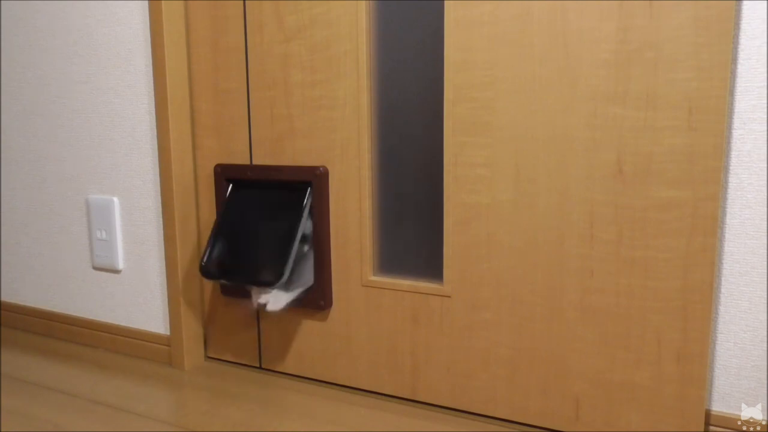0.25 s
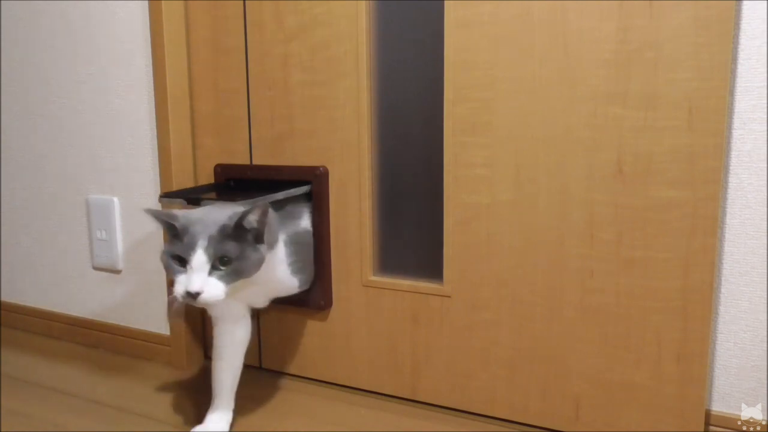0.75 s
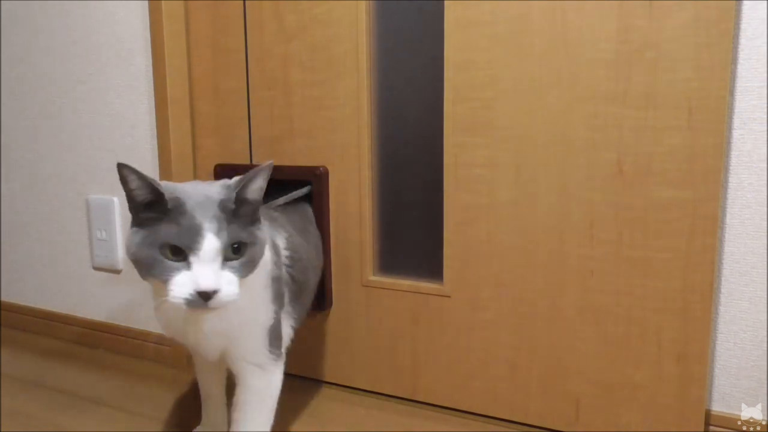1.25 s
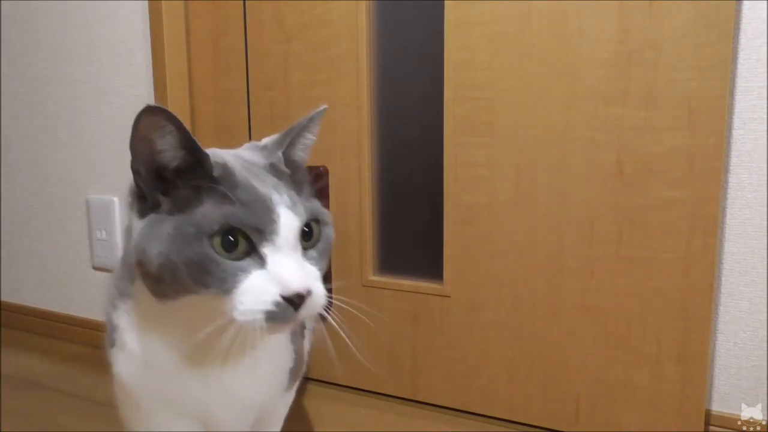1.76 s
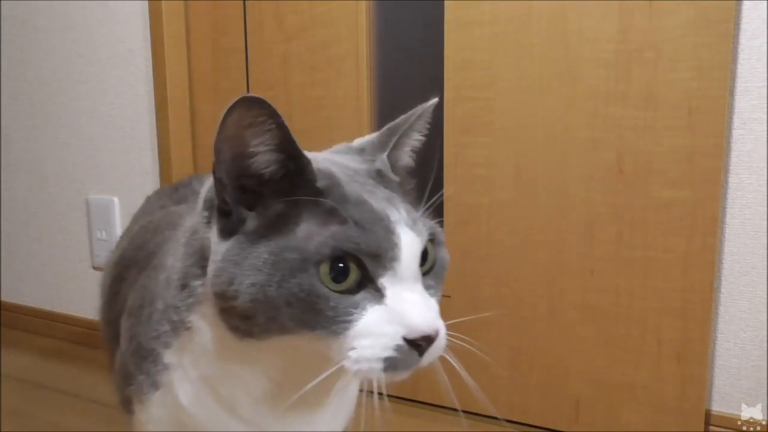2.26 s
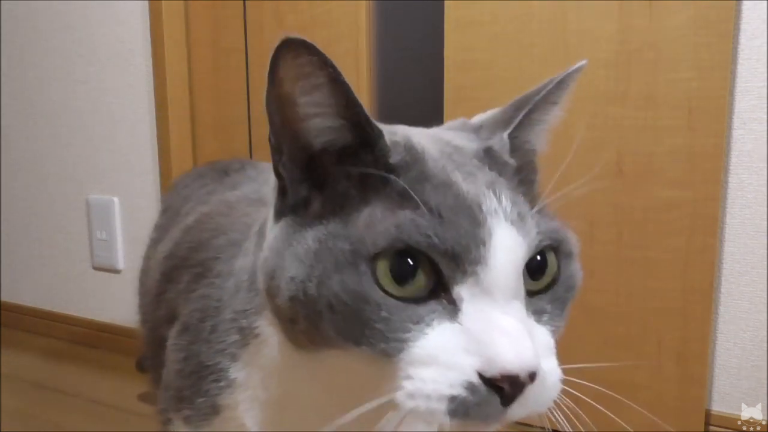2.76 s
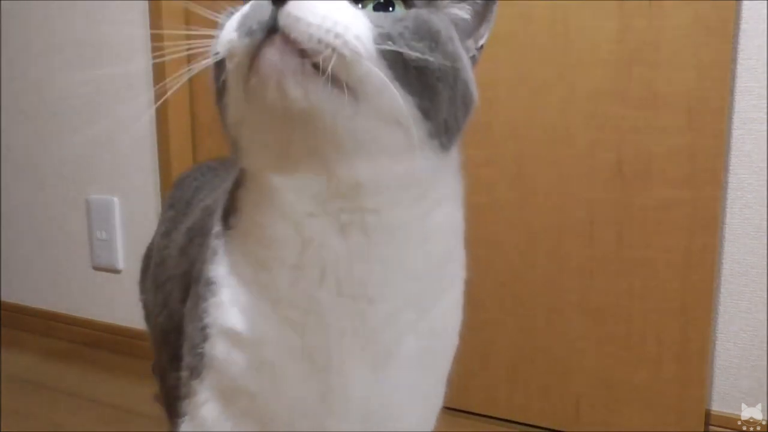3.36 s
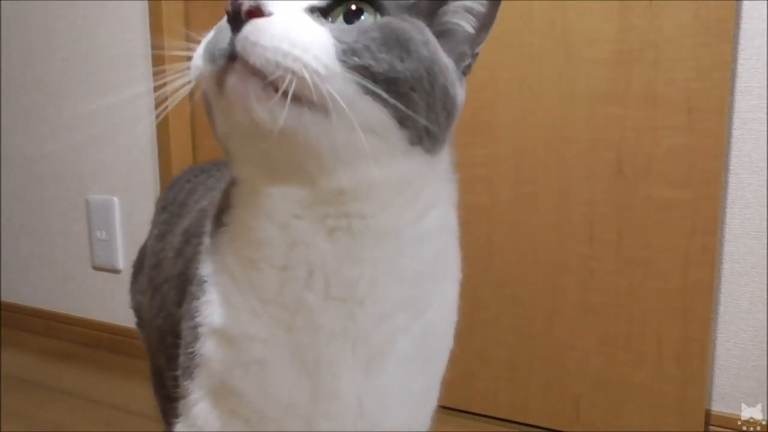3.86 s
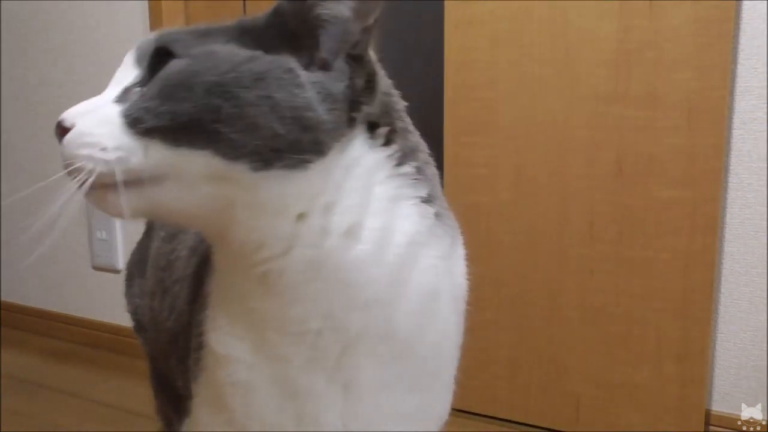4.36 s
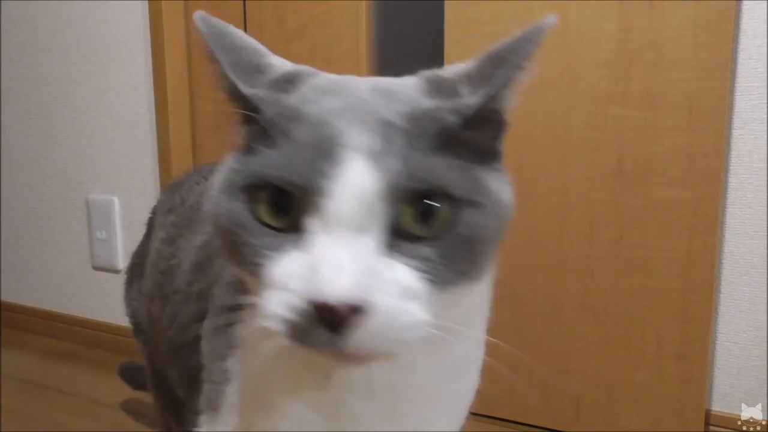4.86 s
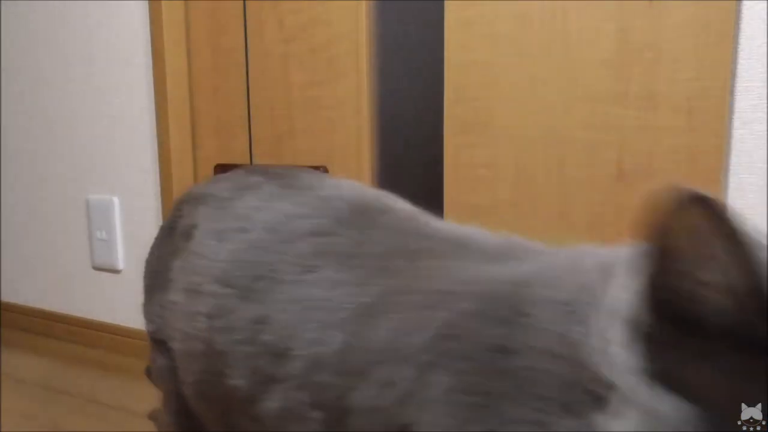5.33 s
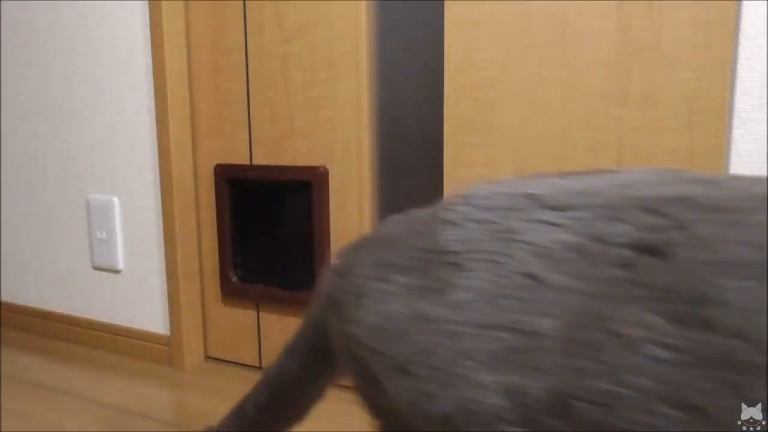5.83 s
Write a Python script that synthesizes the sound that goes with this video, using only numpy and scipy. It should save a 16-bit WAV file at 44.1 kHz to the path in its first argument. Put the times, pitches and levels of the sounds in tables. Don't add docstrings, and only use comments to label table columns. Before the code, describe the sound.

In a small hard room, a cat pushes through a plastic flap in a wooden door: light taps, a sharp cluster of knocks, faint fur brushing, softer bumps, then the flap drops with the loudest double clack and rattles to rest. Low house hum and hiss follow, with tiny clicks. At the end the cat, to the right, trills into a meow. Close stereo microphones.

```python
import sys
import numpy as np
from scipy import signal
from scipy.fft import rfft, irfft, next_fast_len
from scipy.io import wavfile

SR = 44100
rng = np.random.default_rng(int(sys.argv[2]) if len(sys.argv) > 2 else 0)


def int16_out(signal):
    q = np.round(np.clip(np.atleast_2d(signal).T, -1, 1) * 32767)
    wavfile.write(sys.argv[1], SR, q.astype(np.int16))


def convert_level_to_amplitude(level_db):
    exponent = np.asarray(level_db, float) / 20
    return 10 ** exponent


N = 268569
TIME = np.arange(N) / SR
PAD = 2 * next_fast_len(N // 2 + 2048)
FREQ = np.maximum(np.fft.rfftfreq(PAD, 1 / SR), 1)


def read(table, hz):
    return np.interp(np.log(hz), np.log(np.array(table)[:, 0]), np.array(table)[:, 1])


def noise(gain):
    spectrum = rng.standard_normal(len(FREQ)) + 1j * rng.standard_normal(len(FREQ))
    x = irfft(gain * spectrum, PAD)[:N]
    return x / x.std()


def peak(hz, width_hz):
    return 1 / np.sqrt(1 + ((FREQ - hz ** 2 / FREQ) / width_hz) ** 2)


def walk(rate_hz):
    return noise(1 / (1 + (FREQ / rate_hz) ** 2))


def swell(rows, skew, gain=convert_level_to_amplitude):
    total = 0
    for start_s, length_s, db in rows:
        progress = np.clip((TIME - start_s) / length_s, 0, 1)
        total = total + gain(db) * np.sin(np.pi * progress ** skew)
    return total


def ring(hz, t60_s, rise_s, length_s=.25):
    t = np.arange(int(length_s * SR)) / SR
    decay = np.exp(-np.log(1000) * t / t60_s)
    return np.sin(2 * np.pi * hz * t) * (1 - np.exp(-t / rise_s)) * decay


def add(out, s, x):
    i = int(s * SR)
    out[..., i:i + x.shape[-1]] += x[..., :N - i]


def stereo(mid, other, side_table):
    side = irfft(rfft(other, PAD) * convert_level_to_amplitude(read(side_table, FREQ)), PAD)[:len(mid)]
    return np.array([mid + side, mid - side])


def panel(blows, modes, scatter_db, rise_s, slap_db, room_db):
    # f/Hz, level/dB per Hz
    slap_modes = [(150, -33), (300, 4), (700, 8), (1200, 1), (1700, -21.5), (2300, -22), (3000, -31)]
    wood_t60_s = .1
    out = np.zeros((2, N))
    chance = rng.standard_normal((len(blows), 2, len(modes)))
    frame = noise(convert_level_to_amplitude(read(slap_modes, FREQ)))
    t = TIME[:SR // 4]
    for (s, db, tilt_db, hold), (mix, shift) in zip(blows, chance):
        hold = np.clip(hold, .1, 1.5)
        modal = np.zeros(int(.25 * SR))
        for (hz, mode_db, t60_s), m, d in zip(modes, mix, shift):
            level = convert_level_to_amplitude(mode_db + tilt_db * np.log2(hz / 300) + scatter_db * m) * np.sign(d)
            t60_s = min(t60_s, wood_t60_s * (300 / hz) ** 0.22) * hold
            modal += level * ring(hz * (1 + 0.019 * d), t60_s, rise_s * (1 + 1.6 * (hz > 600)))
        slap = frame[int(s * SR):int(s * SR) + len(t)]
        slap = slap * (1 - np.exp(-t / (1.07 * rise_s))) ** 2 * np.exp(-t / (0.015 * hold))
        blow = convert_level_to_amplitude(db) * (modal / np.abs(modal).max() + convert_level_to_amplitude(slap_db + 1.53 * tilt_db) * slap)
        add(out, s, blow * convert_level_to_amplitude(np.array([[0], [room_db]])))
    return out


def door_panel():
    # t/s, peak level/dB, hardness as tilt/(dB per octave), ring length factor
    blows = [(0.166, -33.5, 0.5, 0.64), (0.187, -45, -1.5, 0.7), (0.254, -32.5, -10, 1),
             (0.274, -36.5, 4.5, 0.88), (0.294, -30, -0.5, 0.89), (0.33, -27, 2.5, 0.33),
             (0.344, -36.5, 0, 0.28), (0.799, -30.5, -8, 0.23), (1.118, -37, -1.5, 0.86),
             (1.145, -48, 5, 0.51), (1.538, -41.5, -2.5, .9), (1.664, -32, -17, 0.65),
             (1.684, -29, 1.5, 0.67), (1.719, -30, -4.5, 0.62), (2.33, -29, -4, 0.33),
             (2.384, -16.5, -1, 0.74), (2.402, -18.5, 4, 1), (2.429, -28.5, 5.5, 0.68),
             (2.75, -26, 5, 0.14), (2.774, -28, -3, 0.5), (2.794, -32.5, 6.5, 0.55),
             (2.839, -36, -1.5, 0.79)]
    # f/Hz, level/dB, T60/s
    door_modes = [(231.4, -2.5, 0.2), (273, 2, 0.7), (355, -3.5, 0.28), (527, -2, 5.0), (574, -14, 0.24),
                  (675, -14.5, 0.23), (820, -33, 1.5), (893, -26, 5.0), (990, -45, 0.3), (1116, -20, 0.19),
                  (1440, -28, 0.05), (1530, -38, 0.05), (1720, -39, 0.38), (2110, -29, 0.18)] + [(171, -12, 0.19), (435.5, -10.0, .2)]
    return panel(blows, door_modes, scatter_db=3.9, rise_s=0.0031, slap_db=-11, room_db=-3)


def flap_panel():
    # t/s, peak level/dB, hardness as tilt/(dB per octave), ring length factor
    shoves = [
        (0.475, -21, -6.5, 0.47),
        (0.484, -20, 0.7, 0.8),
        (0.5, -16.5, 0.1, 0.45),
        (0.529, -26, -3, 0.53),
    ]
    # f/Hz, level/dB, T60/s
    flap_modes = [(144.6, -14, 1.1), (257, 2.5, 0.53), (348, 3, 0.089), (477, -1, 0.42), (552, 1.5, 0.41),
                  (642, 3, 0.11), (730, -1, 0.4), (816, -38, 0.29), (986, -2.5, 0.2), (1260, -28, 0.43),
                  (1280, -19, 0.23), (1364, -2.5, 0.24), (1500, -14, 0.21), (2000, -39, 0.26)]
    return panel(shoves, flap_modes, scatter_db=0.66, rise_s=0.0044, slap_db=-7.0, room_db=-5)


def thumps():
    # t/s, peak level/dB, f/Hz
    weights = [(0.1609, -22, 213), (0.293, -36, 270), (0.473, -20, 326), (0.508, -36, 623),
               (0.535, -31, 560), (0.799, -29.5, 104), (1.121, -40, 283), (1.677, -32.5, 111),
               (1.679, -23, 225), (1.689, -22.5, 218), (1.708, -25, 226), (1.731, -37, 260),
               (1.762, -29.5, 260), (2.38, -13.5, 268), (2.405, -13, 245), (2.432, -28, 570),
               (2.753, -38, 330), (2.772, -23, 268), (2.845, -29, 244)]
    out = np.zeros(N)
    for s, db, hz in weights:
        add(out, s, convert_level_to_amplitude(db) * ring(hz, 12.3 / hz, 0.0012))
    return out


def ticks():
    # t/s, peak level/dB, ring f/Hz, crack level/dB
    edge_ticks = [(0.168, -41.5, 1280, -58.5), (0.257, -44.5, 1350, -59.5), (0.2852, -42.5, 1320, -61),
                  (0.3321, -42, 1350, -63), (1.6796, -42, 1383, -56), (2.7352, -32.5, 1527, -56.5),
                  (2.7707, -31.5, 1260, -51), (2.7844, -37, 1280, -58), (2.831, -36, 1420, -66),
                  (2.8384, -38, 1550, -65), (2.8807, -34.5, 1450, -56.5), (2.9297, -43.5, 1390, -70)]
    slams = [
        (0.4837, -28, 1467, -46.5),
        (0.4944, -26, 1483, -47),
        (2.3858, -31.5, 1530, -40.5),
        (2.3984, -49, 1530, -54),
        (2.4139, -37, 1660, -52),
        (2.4268, -31, 1410, -49.5),
    ]
    # t/s, ring level/dB, crack level/dB
    claws_lips = [(0.7951, -51, -53.5), (1.6268, -64, -57), (2.2846, -53, -58), (2.295, -65, -61),
                  (4.5166, -55, -63), (5.1212, -69, -60.5), (5.3426, -58, -75), (5.402, -71, -61),
                  (5.521, -73, -59.5), (5.5531, -66, -51.5)]
    # t/s, peak level/dB
    latch = [
        (0.185, -45),
        (0.214, -54),
    ]
    # f/Hz, level/dB per Hz
    crack_bands = [(2200, -27), (3000, -36), (3600, 5), (4700, 4), (6100, -9), (8000, -3.5), (11000, -16),
                   (14000, -43), (15500, -51)]
    clicks = [(s, db, 1420, crack_db) for s, db, crack_db in claws_lips]
    out = np.zeros((2, N))
    crack = noise(convert_level_to_amplitude(read(crack_bands, FREQ)) * (FREQ > 2000))
    t = TIME[:int(.05 * SR)]
    for rows, pan_db, thin in ((edge_ticks, 3, 0.45), (slams, 7, 0.96), (clicks, 1.5, 0.66)):
        for s, db, hz, crack_db in rows:
            edge = ring(hz, 0.019, 0.00016, .05)
            edge += 0.44 * ring(1.31 * hz, 0.02, 0.0011, .05)
            edge += 0.45 * ring(0.81 * hz, 0.061, 0.0027, .05)
            snap = crack[int(s * SR):int(s * SR) + len(t)] * np.exp(-t / (73 / SR))
            snap = (1 - thin) * snap + thin * np.diff(snap, n=2, prepend=[0, 0])
            tick = convert_level_to_amplitude(db - 0.5) * edge + convert_level_to_amplitude(crack_db + 11.5) * snap
            add(out, s, tick * convert_level_to_amplitude(np.array([[pan_db], [-pan_db]]) / 2))
    for s, db in latch:
        add(out, s, convert_level_to_amplitude(db) * ring(1074, 0.09, .003))
    return out


def brushes():
    # start t/s, length/s, level/dB
    strokes = [(0.23, 0.17, -63.5), (0.478, 0.059, -42.5), (0.83, 0.094, -66), (1.35, 0.33, -73.5),
               (1.616, 0.17, -59.5), (1.781, 0.12, -63.5), (2.381, 0.12, -45), (2.732, 0.29, -56),
               (0.894, 1, -71)]
    # f/Hz, level/dB per Hz
    brush_bands = [(350, -36), (600, -0.5), (1070, 8.5), (1600, -8.5), (4710, -5.5), (6780, -15),
                   (10400, -13), (15000, -37)]
    # f/Hz, side minus mid level/dB
    fur_side = [(600, -2), (3000, -3.5), (12000, -5)]
    grain = noise(convert_level_to_amplitude(read(brush_bands, FREQ)) * (FREQ > 600))
    return swell(strokes, 0.36) * convert_level_to_amplitude(1.65 * walk(150)) * stereo(grain, grain[::-1], fur_side)


def mouth(hz, mouth_hz):
    r = hz / mouth_hz
    sharpness, steepness = 3.3, 1.5
    jaws = ((1 - r ** 2) ** 2 + (r / sharpness) ** 2) ** (-steepness / 2)
    q = r / 2.05
    nasal = np.sqrt(((1 - q ** 2) ** 2 + (.6 * q) ** 2) / (1 + q ** 4))
    throat_hz, throat_width_hz = 1820, 450
    throat = 1 + convert_level_to_amplitude(8) / (1 + (2 * (hz - throat_hz) / throat_width_hz) ** 2)
    folds = convert_level_to_amplitude(-2 * np.log2(hz / 350))
    opening = np.clip((mouth_hz - 930) / 250, 0, 1) ** 2
    wide = convert_level_to_amplitude(-17) * opening * (hz > 1900) * (2000 / hz) ** 1.2
    return folds * jaws * nasal * throat + wide


def cat():
    # t/s, pitch f/Hz, effort level/dB, mouth resonance f/Hz
    meow = [
        (5.62, 350, -59, 330),
        (5.651, 320, -44.5, 510),
        (5.68, 312.2, -41, 544),
        (5.735, 322.1, -43, 533),
        (5.774, 356.3, -40.5, 652),
        (5.888, 365.1, -39.5, 787),
        (5.959, 380.3, -43, 926),
        (6.02, 377.5, -45, 1060),
        (6.09, 371.8, -37.5, 1320),
    ]
    # crest t/s, depth (0-1), push level/dB
    trill = [(5.631, 0.66, -2), (5.651, 0.32, 0), (5.679, .95, 1), (5.702, 0.86, 2), (5.726, 0.9, 2),
             (5.755, 0.43, 1.5), (5.782, 1, -0.5), (5.807, 0.26, -2), (5.828, 0.94, -3.5), (5.858, 0, -1.5),
             (5.886, 0.39, -0.5), (5.912, 0.97, 3), (5.936, 1, 0.5), (5.967, 0.97, 2.5), (5.998, 1, 7.5),
             (6.013, 0.33, 4), (6.037, 0.37, 3.5), (6.071, 0.32, -0.5), (6.1, 0, -8)]
    # f/Hz, width/Hz, level/dB
    breath = [(2800, 370, -1), (4380, 1200, 1.5), (7900, 2900, -2.5)]
    # start t/s, length/s, level/dB
    puffs = [
        (5.65, 0.051, -64.5),
        (5.72, 0.12, -70),
        (5.82, 0.26, -59.5),
        (6.02, 0.16, -68),
    ]
    s, *columns = np.transpose(meow)
    hz, effort_db, mouth_hz = (np.interp(TIME, s, c) for c in columns)
    crest, *columns = np.transpose(trill)
    depth, push_db = (np.interp(TIME, crest, c) for c in columns)
    throbs = np.interp(TIME, crest, np.arange(len(crest)))
    flutter = (1 - np.cos(2 * np.pi * throbs)) / 2
    shut = depth * flutter
    sag = 0.15 * np.clip(1 - mouth_hz / 1342, 0, 1) * np.clip(depth + .3, 0, 1)
    phase = 2 * np.pi * np.cumsum(hz * (1 - sag * flutter)) / SR
    phase = phase + 2.2 * sag * walk(90)
    voice = (1 - 0.65 * shut) * mouth(hz, mouth_hz) * np.sin(phase)
    upper = 0
    for k in range(2, 13):
        upper = upper + convert_level_to_amplitude(1.5) * mouth(k * hz, mouth_hz) * np.sin(k * phase + 0.275 * k ** 2)
    ninth = convert_level_to_amplitude(-42.5) * np.clip((TIME - 6.055) / 0.015, 0, 1) * np.sin(9 * phase)
    nose = convert_level_to_amplitude(-61.0) * np.exp(-((TIME - 5.95) / 0.062) ** 2) * noise(peak(3867, 130) ** 2)
    rasp = convert_level_to_amplitude(-9) * np.clip(depth + 0.45, 0, 1) * noise(peak(950, 800) ** 2)
    air = swell(puffs, 0.81) * noise(sum(convert_level_to_amplitude(db) * peak(f, w) ** 2 for f, w, db in breath))
    start = np.clip((TIME - s[0]) / 0.012, 0, 1)
    throat = convert_level_to_amplitude(effort_db + push_db) * (voice + (1 - shut) * upper + (1 - .5 * shut) * rasp)
    return start * (throat + ninth + (1 - 0.62 * shut) * air + nose)


def from_right(x):
    left_lag_s = 0.00017
    shadow = convert_level_to_amplitude(-5.0 * np.clip(np.log2(FREQ / 350), 0, 1))
    delay = np.exp(-2j * np.pi * np.minimum(FREQ, 1250) * left_lag_s)
    return np.array([irfft(rfft(x, PAD) * shadow * delay, PAD)[:N], x])


def paws():
    # t/s, peak level/dB
    steps = [
        (5.663, -33),
        (5.87, -38),
    ]
    out = np.zeros(N)
    for s, db in steps:
        add(out, s, convert_level_to_amplitude(db) * ring(99, 0.096, 0.0048))
    return out


def echoes():
    # f/Hz, T60/s
    room_t60 = [(100, 0.24), (400, 0.39), (1500, 0.38), (5000, 0.48), (12000, 0.13)]
    # f/Hz, side minus mid level/dB
    room_side = [(200, -19.5), (700, -7), (2000, -5.5), (10000, -12.5)]
    tails = np.zeros((2, N))
    for hz in 60 * 2. ** np.arange(9):
        band = np.exp(-np.log2(FREQ / hz) ** 2 / .5)
        fade = np.exp(-np.log(1000) * TIME / read(room_t60, hz)) * np.clip(TIME / 0.0014, 0, 1)
        tails += np.sqrt(hz) * fade * np.array([noise(band), noise(band)])
    tails = tails[:, :SR] / np.sqrt(np.sum(tails[0] ** 2))
    return stereo(tails[0], tails[1], room_side)


def room(x):
    return signal.fftconvolve(echoes(), x[None], axes=1)[:, :N]


def house():
    # f/Hz, level/dB per Hz
    rumble = [(15, -38), (25, -14), (38, -24.5), (98, -6.5), (135, -9.5), (199, -4.5), (234, -17), (269, 3),
              (316, -11), (372, -6.5), (502, -12.5), (1030, -18), (1780, -34), (2250, -32), (6200, -42),
              (8060, -79), (13600, -120)]
    # f/Hz, width/Hz, level/dB
    hum = [(49.4, 3.9, -67.5), (93, 28, -64.5), (114.6, 63, -66), (200.6, 63, -62.5), (255, 100, -67),
           (377, 6.3, -70.5), (719, 37, -75), (1019, 22, -75.5), (1350, 430, -73), (2223, 160, -83)]
    # f/Hz, level/dB per Hz
    hiss_bands = [(3650, -40), (6200, -16), (6930, -2.5), (7860, 0.5), (9410, 2), (10000, 2.5),
                  (10800, 1.5), (14200, 0), (15500, -5)]
    # start t/s, length/s, added level/dB
    rustles = [
        (-.3, 3.04, 3),
        (5.4, 2, 3.5),
    ]
    # f/Hz, side minus mid level/dB
    house_side = [(60, -17), (110, -13.5), (200, -11), (380, -8.5), (700, -4), (1290, -3.5), (2380, -5.5),
                  (4400, 1), (8120, -11.5), (15000, -17)]
    waver = [convert_level_to_amplitude(db + 1.4 * walk(4.1)) for f, w, db in hum]

    def layer():
        bed = convert_level_to_amplitude(-52 - 2.5) * noise(convert_level_to_amplitude(read(rumble, FREQ)))
        hiss = convert_level_to_amplitude(-69.5 + swell(rustles, 1.0, gain=float)) * noise(convert_level_to_amplitude(read(hiss_bands, FREQ)))
        tones = sum(gain * noise(peak(f, w) ** 2) for gain, (f, w, db) in zip(waver, hum))
        return bed + hiss + tones

    return stereo(layer(), layer(), house_side)


def scene():
    door, door_far = door_panel() + flap_panel()
    edge, fur, voice, floor = ticks(), brushes(), cat(), thumps()
    to_walls = door_far + convert_level_to_amplitude(-12) * floor + convert_level_to_amplitude(-7) * voice
    to_walls += convert_level_to_amplitude(-7) * edge.mean(axis=0) + convert_level_to_amplitude(-9.5) * fur.mean(axis=0)
    wood = (door + floor) * convert_level_to_amplitude(np.array([[-2.4], [-3.6]]))
    return wood + edge + fur + convert_level_to_amplitude(3.0) * from_right(voice) + paws() + room(to_walls) + house()


def roll_off(x):
    return signal.sosfilt(signal.butter(12, 15610, fs=SR, output="sos"), x)


def record(dry):
    bass_cut = signal.butter(4, 42, "high", fs=SR, output="sos")
    mix = signal.sosfilt(bass_cut, dry)
    return roll_off(mix)


dry = scene()
out = record(dry)
int16_out(out)
```